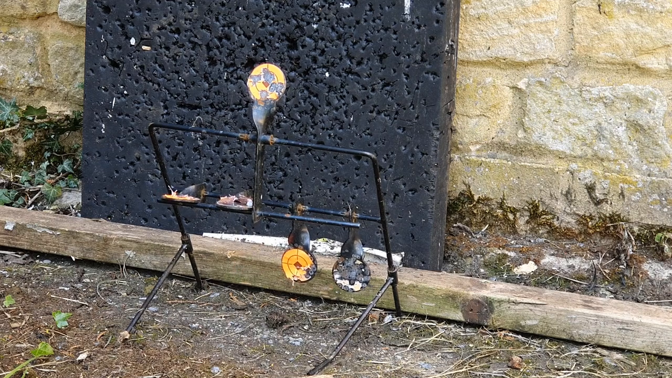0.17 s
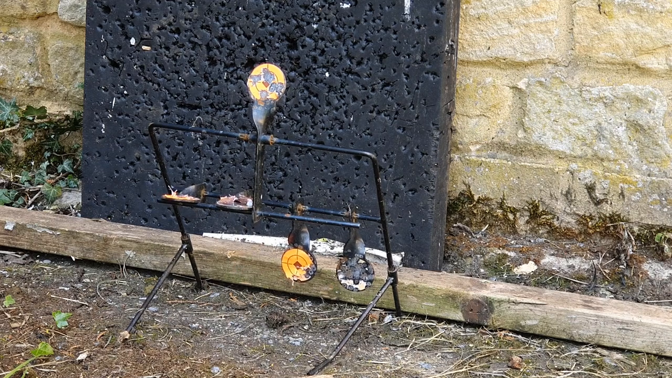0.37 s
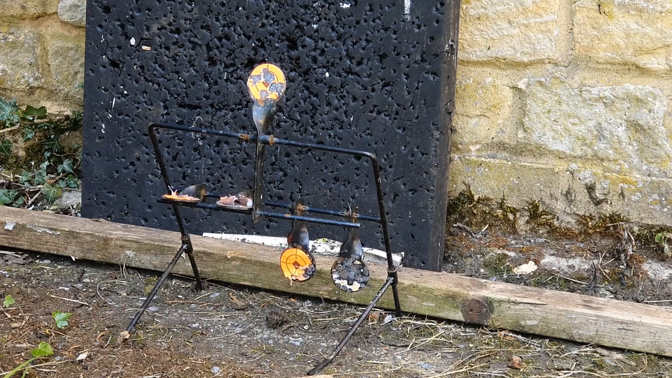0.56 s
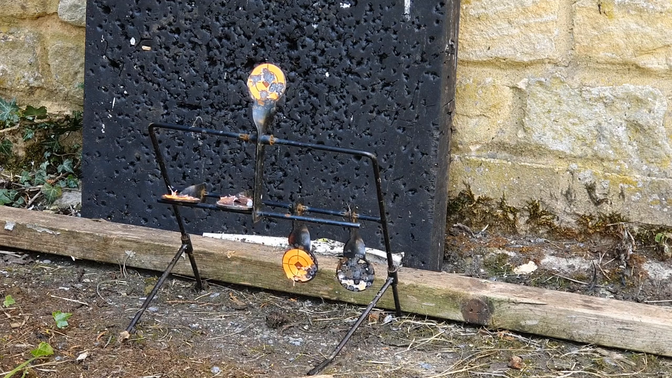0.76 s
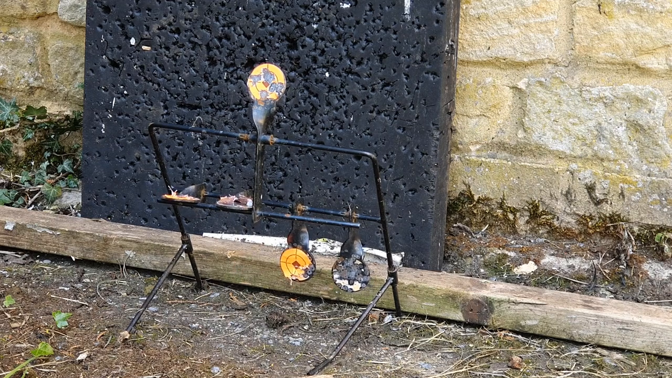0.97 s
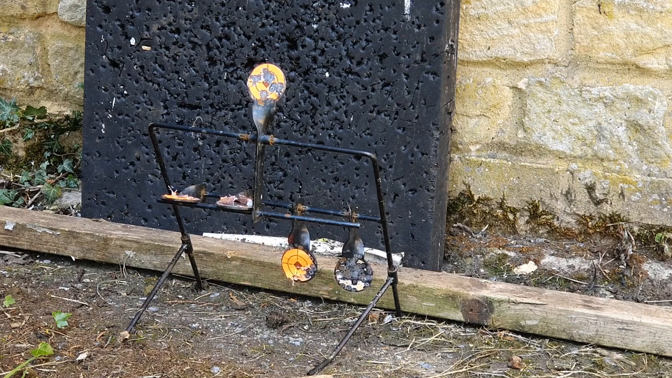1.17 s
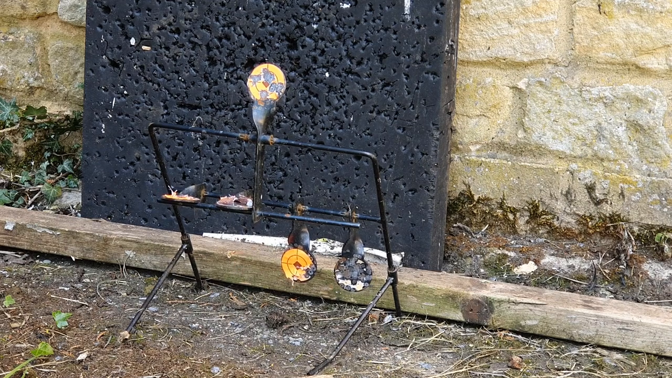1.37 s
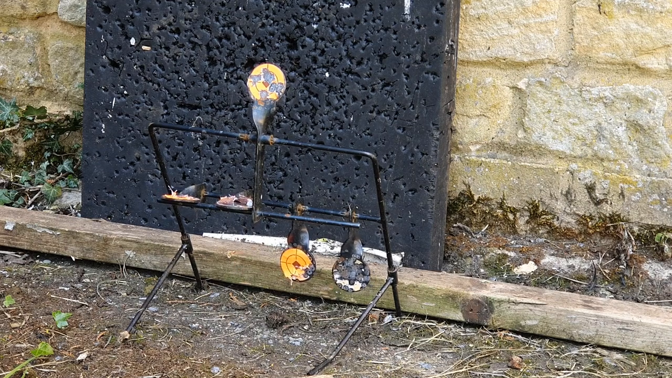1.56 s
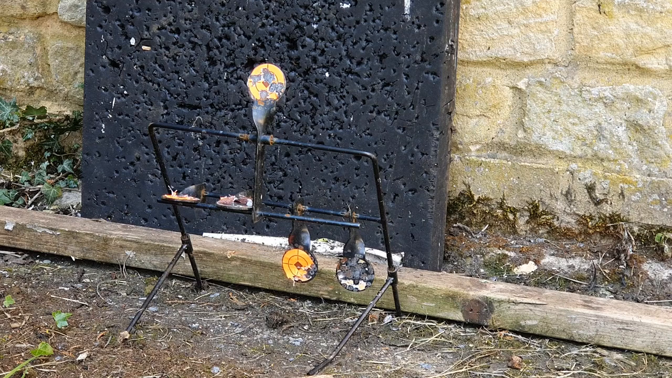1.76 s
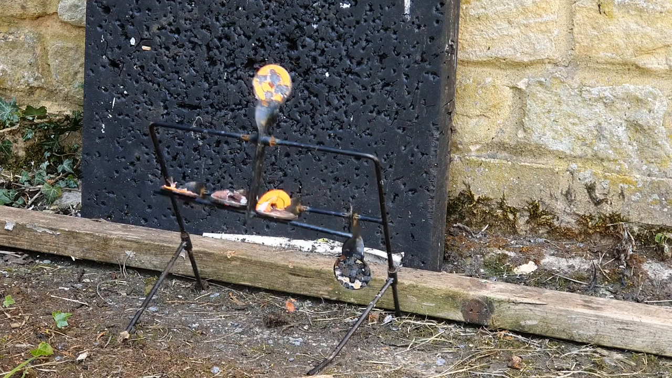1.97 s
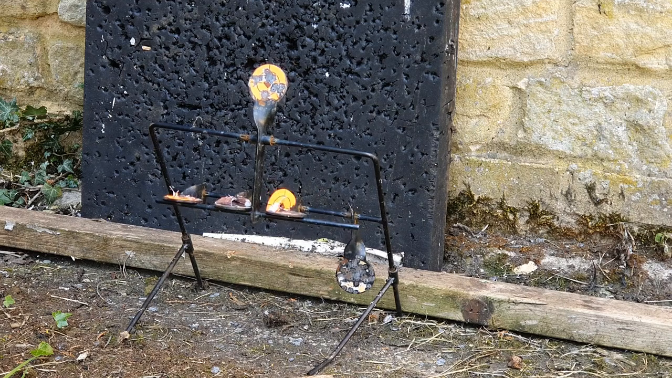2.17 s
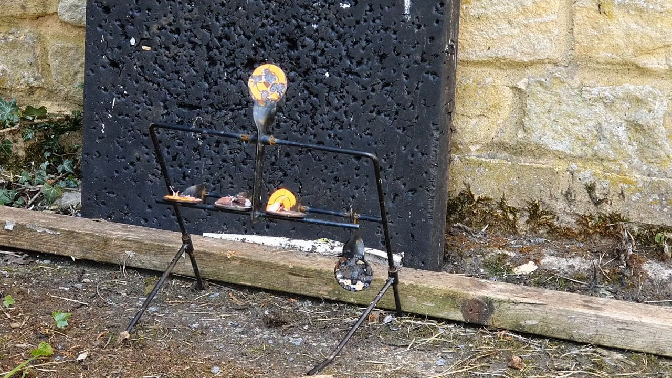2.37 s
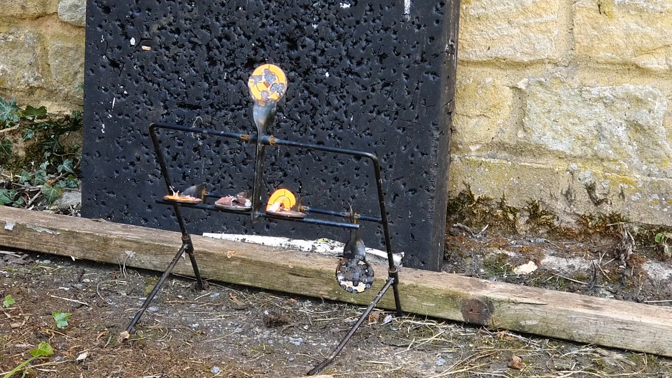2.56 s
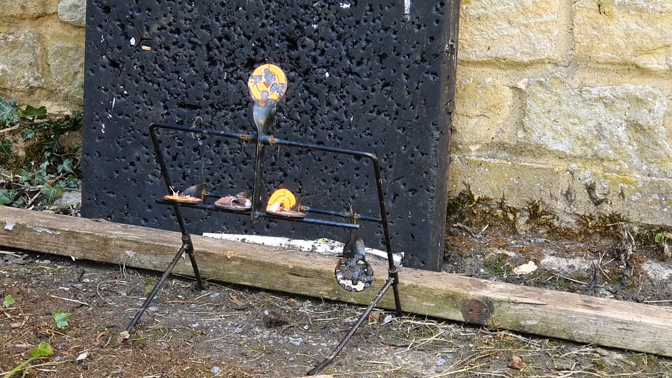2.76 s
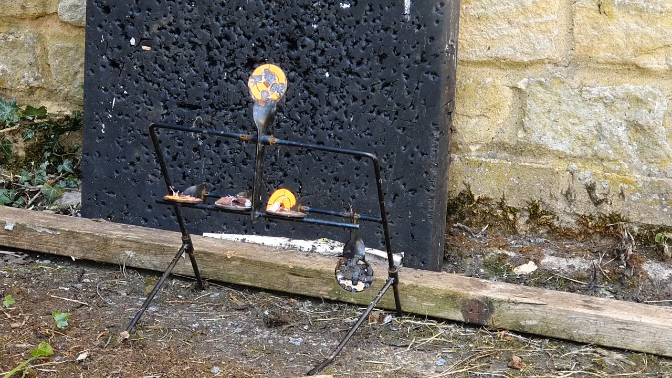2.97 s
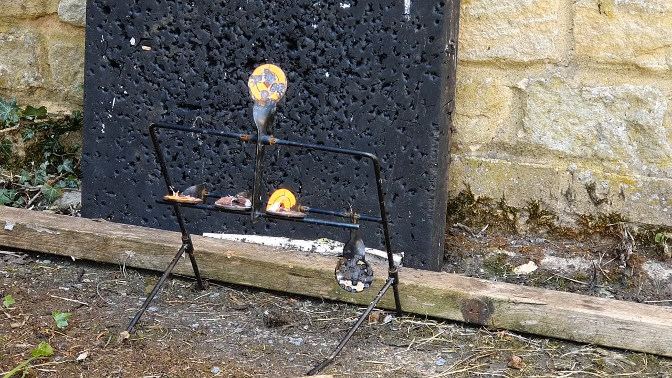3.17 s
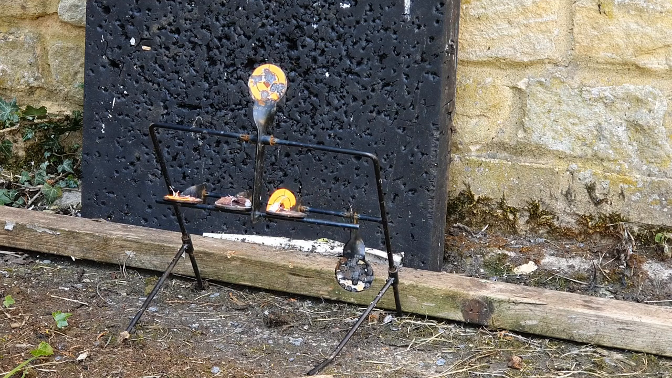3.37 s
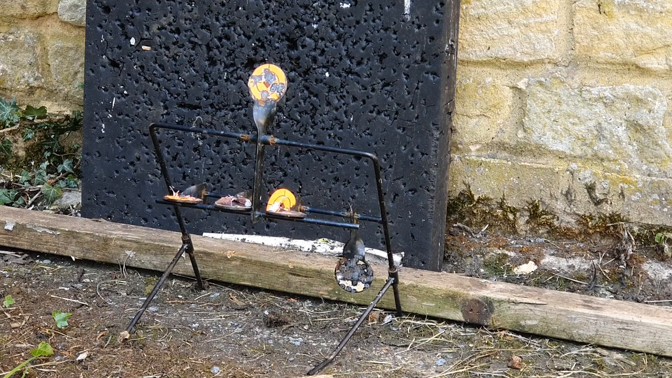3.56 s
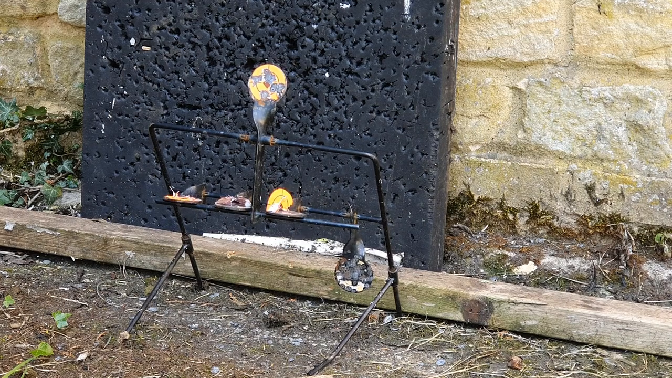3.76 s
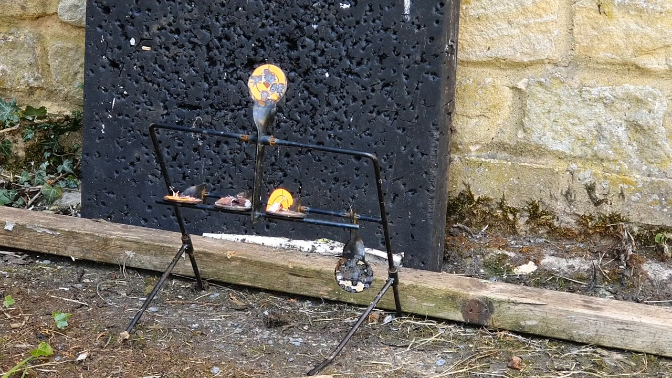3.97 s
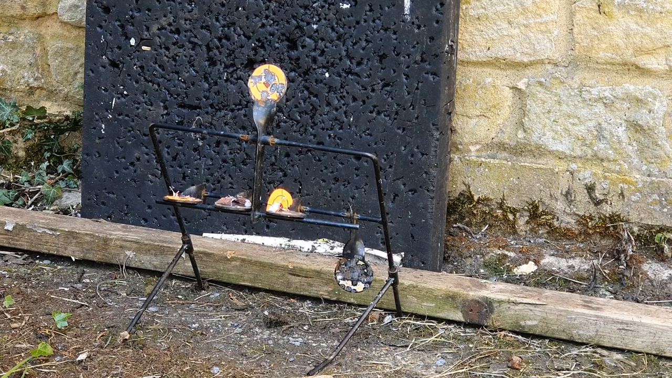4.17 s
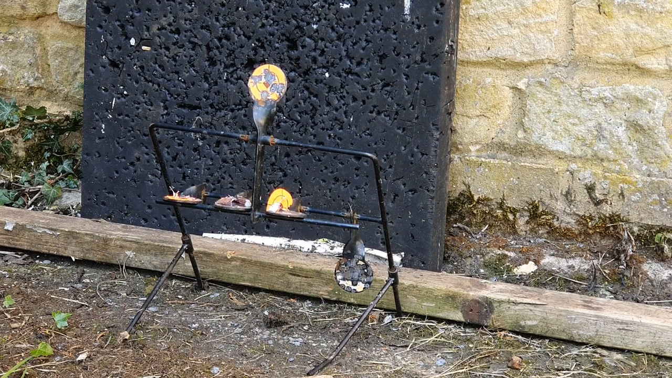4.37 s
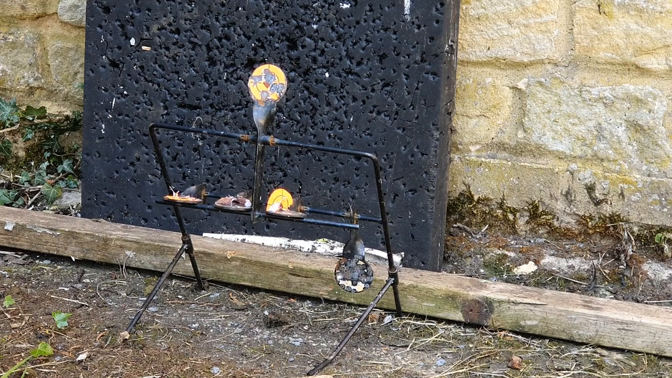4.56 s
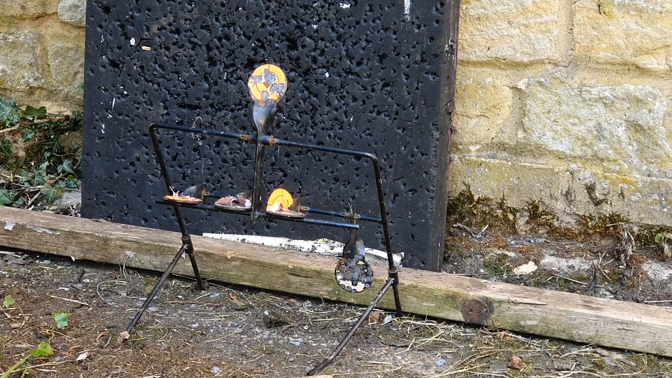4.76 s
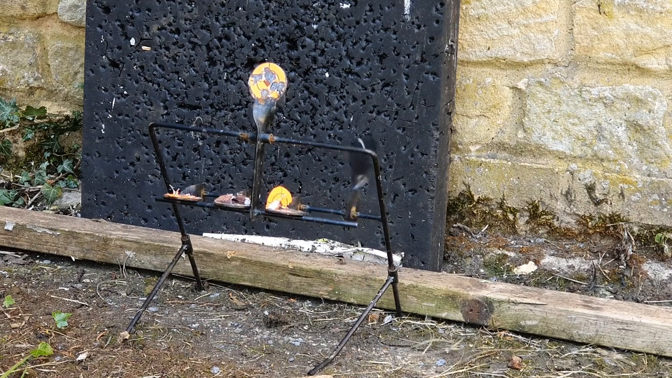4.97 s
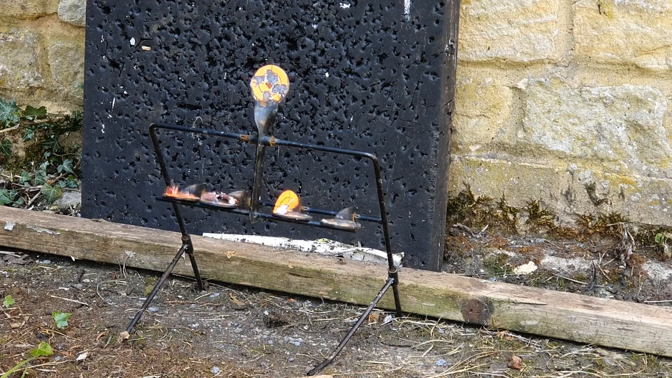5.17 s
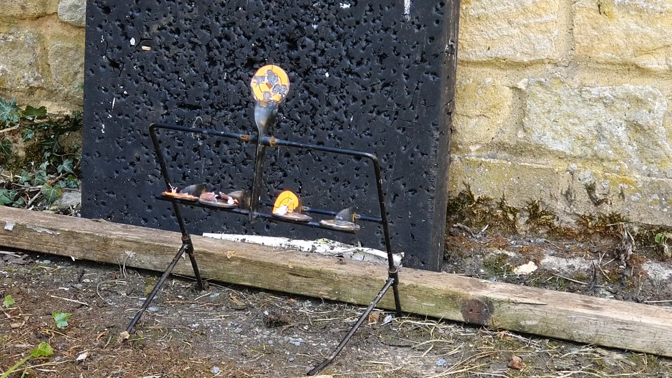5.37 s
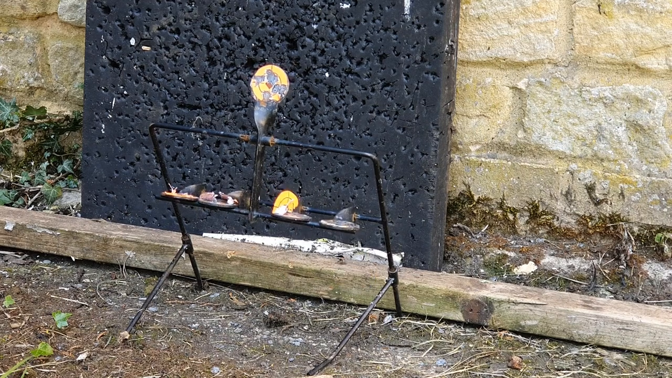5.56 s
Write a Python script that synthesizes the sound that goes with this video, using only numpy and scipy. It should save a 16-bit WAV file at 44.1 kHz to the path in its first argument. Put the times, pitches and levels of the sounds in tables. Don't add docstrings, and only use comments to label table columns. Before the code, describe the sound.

A quiet garden range: low wind puffs, faint hiss and distant bird whistles. Just before two seconds comes a dry, loud air rifle crack, then a metallic smack and a bright clank with rapid rattling that dies quickly. Birds and small ticks return. Near five seconds a slightly softer shot strikes steel, and the flipped paddle clanks and chatters a little later. Short yard echoes, close stereo microphone.

```python
import sys
import numpy as np
from scipy import signal
from scipy.fft import rfft, irfft, next_fast_len
from scipy.io import wavfile
from scipy.ndimage import uniform_filter1d, map_coordinates

SR = 44100
rng = np.random.default_rng(int(sys.argv[2]) if len(sys.argv) > 2 else 0)


def volts_from_decibels(level):
    exponent = np.asarray(level, float) / 20
    return 10 ** exponent


def put_to_file(sound):
    columns = np.atleast_2d(sound).T
    safe = np.clip(columns, -1, 1)
    whole_steps = np.round(safe * 32767)
    wavfile.write(sys.argv[1], SR, whole_steps.astype(np.int16))


N = 251370
T = np.arange(N) / SR


def unit(x):
    return x / np.sqrt(np.mean(x ** 2) + 1e-20)


def along(points, hz):
    f, v = np.transpose(points)
    return np.interp(np.log(hz + 1), np.log(f + 1), v)


def level(rows):
    s, db = np.transpose(rows)
    return volts_from_decibels(np.interp(T, s, db, left=-200, right=-200))


def pan(db):
    return volts_from_decibels([[db / 2], [-db / 2]])


def add(out, s, x):
    i = round(s * SR)
    out[:, i:i + x.shape[1]] += x[:, :N - i]


def filtered(x, response):
    n = x.shape[-1]
    m = next_fast_len(n + 8192)
    return irfft(rfft(x, m) * response(np.fft.rfftfreq(m, 1 / SR)), m)[..., :n]


def peak(hz, width_hz):
    return lambda f: 1j * f * width_hz / (hz * hz - f * f + 1j * f * width_hz)


def rush(spectrum, alike, size=N):
    def shape(hz):
        turn = np.arccos(np.clip(along(alike, hz), -1, 1)) / 2
        return volts_from_decibels(along(spectrum, hz)) * [np.cos(turn), np.sin(turn)]

    mid, side = filtered(rng.standard_normal((2, size)), shape)
    return unit(np.array([mid + side, mid - side]))


# pitch_hz, t60_s
YARD_DECAY = [(100, .7), (500, 0.5), (2000, 0.62), (5000, 0.41), (10000, 0.34), (16000, 0.32)]


def tail(spectrum, stretch, bass=1):
    noise = rush(spectrum, [(60, 0.51), (300, .62), (1400, 0.0065)], size=SR)
    hz, t, z = signal.stft(noise, SR, nperseg=256)
    low_stretch = bass ** (1 / (1 + (hz / 900) ** 2))
    t60 = stretch * low_stretch * along(YARD_DECAY, hz)
    fall_db = 60 * t / t60[:, None] + 16 * (t / 0.55) ** 3
    patches = uniform_filter1d(rng.standard_normal(z.shape), size=3, axis=1)
    patches = uniform_filter1d(patches, size=5, axis=2)
    return signal.istft(z * volts_from_decibels(4.6 * unit(patches) - fall_db), SR, nperseg=256)[1][:, :SR]


def in_room(x, room):
    return signal.fftconvolve(x, room / np.linalg.norm(room[0]), axes=1)[:, :N]


# pitch_hz, left_right_db
SHADOW = [(500, 2), (3500, 3), (5500, -3), (10000, -5), (14000, 4)]


def shaded(x):
    return filtered(x, lambda hz: volts_from_decibels(along(SHADOW, hz) * [[.5], [-.5]]))


def crack(left_db, left_hz, right_db, right_hz, bright_db):
    t = np.arange(400) / SR
    hz = np.array([[left_hz], [right_hz]])
    snap = np.sin(2 * np.pi * hz * t) * volts_from_decibels(5.5 - 60 * t / 0.0012) * (1 - np.exp(-t / .00008))
    snap -= 0.44 * np.roll(snap, 17, axis=1)
    spit = volts_from_decibels(bright_db + 2 - 60 * t / 0.00088) + volts_from_decibels(bright_db - 10.5 - 60 * t / .016)
    hissing = np.diff(rng.standard_normal((2, len(t) + 1))) * .7
    return volts_from_decibels([[left_db], [right_db]]) * (snap + spit * hissing)


ECHO_S = .009


def air(s):
    echo, end = s + ECHO_S, s + .024
    times = [s - 0.004, s, echo - .002, echo + .001, end, end + .015]
    levels_db = -24 + np.array([-36.5, 0, -4.5, -0.5, -.4, -41.5])
    return level(list(zip(times, levels_db)))


# muzzle_s, pellet_flight_s, level_db, left_right_db, echo_length_share
SHOTS = [
    (1.7919, .0328, 0, -1, 1.03),
    (4.8865, .0334, -1.5, -2, 1.03),
]
# left_db, left_hz, right_db, right_hz, bright_db
CRACKS = [
    (-4.5, 4100, 1, 6000, -10.5),
    (-1, 4600, 2, 5040, -12),
    (-4.5, 5200, -5.5, 3300, 0),
]
YARD_BASS = [
    1.35,
    .7,
]
ECHO_LATE_S = [
    .0004,
    0,
]
# pitch_hz, level_db, t60_s
ECHO_RING = (4000, -17, .025)
# pitch_hz, level_db, t60_s
THUD = (510, -33, 0.05)
# pitch_hz, level_db
BLAST_COLOUR = [(45, -42.5), (80, 1), (500, -6), (788, -16.5), (1900, -4), (2390, -5), (4120, -3),
                (6610, -8), (7980, -11.5), (15100, -17.5), (17000, -41)]
# pitch_hz, level_db
YARD_COLOUR = [(45, -43.5), (80, -5), (314, -11), (450, -13.5), (1330, -9), (1980, -10.5), (2960, -5.5),
               (3570, -2), (6010, -3.5), (8170, -8.5), (10400, -1.5), (15100, -11), (17000, -47.5)]


def rifle():
    out, t = np.zeros((2, N)), np.arange(SR // 5)[None] / SR
    for (s, flight, db, side_db, stretch), bass, late in zip(SHOTS, YARD_BASS, ECHO_LATE_S):
        echo = ECHO_S + late
        for delay, snap in zip((0, echo, flight), CRACKS):
            add(out, s + delay, volts_from_decibels(db) * pan(side_db) * crack(*snap))

        push = volts_from_decibels(-27.5 + 0.35 * db - 60 * t / 0.11) * np.sin(2 * np.pi * 97 * t)
        add(out, s - .0015, push * pan(0))

        yard = shaded(tail(YARD_COLOUR, stretch, bass))
        add(out, s + flight, volts_from_decibels(-25 + 0.25 * db) * pan(-2.5) * yard)

        hz, ring_db, t60 = ECHO_RING
        corner = np.sin(2 * np.pi * hz * t + 1.5 * np.sin(3000 * t))
        add(out, s + echo, volts_from_decibels(ring_db - 60 * t / t60) * corner * pan(side_db))

    hz, db, t60 = THUD
    thud = volts_from_decibels(db - 60 * t / t60) * np.sin(2 * np.pi * hz * t)
    add(out, SHOTS[1][0] + ECHO_S, thud * pan(-1.5))
    rushing = rush(BLAST_COLOUR, [(60, 0.92), (400, 0.89), (1500, 0.062)])
    return out + rushing * sum(air(s) for s, *_ in SHOTS) * pan(-.8)


# peak_s, level_db, rise_39db_s, fall_db_per_s
SWINGS = [
    (1.93, -21, -0.0086, 287),
    (5.064, -27, 0.02, 380),
    (5.201, -30, 0.3052, 620),
    (5.3, -73.5, 0.2, 154),
]


def chatter():
    return sum(level([(s - rise, db - 39), (s, db), (s + .3, db - .3 * fall)])
               for s, db, rise, fall in SWINGS)


SECOND_PADDLE_S = 3.7
RINGING = np.flatnonzero((T > 1.8) & (T < 3.3) | (T > 4.9))


def ring(force, hz, t60):
    poles = volts_from_decibels(-60 / (np.array(t60) * SR)) * np.exp(2j * np.pi * hz / SR)
    paddles = np.split(force, [np.sum(T[RINGING] < 4)])
    swing = np.concatenate([signal.lfilter([1], [1, -p], f) for p, f in zip(poles, paddles)])
    turn = np.exp(1j * 0.54 * rng.standard_normal((2, 1)))
    knots = rng.standard_normal(400)
    rocking = np.interp(T[RINGING] * 55, np.arange(len(knots)), knots)
    flutter = volts_from_decibels(1.5 - 2.9 * np.abs(rocking))
    return (swing * flutter * turn).imag * pan(-4 + 2.2 * rng.standard_normal())


# pitch_hz, first_paddle_db, second_paddle_db, first_t60_s, second_t60_s
STEEL = [(1680, -22.5, -23.5, 0.095, .05), (2375, -20.5, -34.5, 0.15, .1), (3410, -22, -38, .22, .1),
         (3490, -34, -20.5, 0.15, .17), (4670, -10.5, -12, 0.073, 0.087), (4780, -1.5, -12, 0.12, .09),
         (5345, -19.5, -8, .2, 0.12), (5800, -13, -19.5, 0.058, .058), (6450, -17.5, -21, 0.4, 0.58),
         (6640, -22.5, -25, .25, .15), (6900, -18, -22, .35, 0.32), (8102, -17, -12.5, 0.11, 0.069),
         (8056, -14.5, -18.5, .17, 0.17), (9500, -17, -15, .15, 0.1), (10150, -11, -11.5, 0.17, .1),
         (10340, -7.5, -8, 0.25, .1), (10420, -8, -7.5, 0.16, 0.18), (11500, -18.5, -16, 0.11, .08),
         (11790, -15.5, -12, 0.077, .075), (12130, -16.5, -17.5, 0.074, .07),
         (13755, -8.5, -11.5, 0.08, .055), (13840, -13, -12, 0.094, .1), (15140, -9.5, -5.5, .11, .065),
         (15600, -17, -15.5, .12, .07), (5330, -13.5, -28, 0.25, .1), (1375, -21.5, -25, .08, 0.054),
         (3200, -15, -19.5, 0.069, 0.11), (3665, -14.5, -21.5, .07, .07), (4088, -15, -26, .07, .07),
         (7600, -15, -20.5, 0.054, .05), (8300, -19.5, -10.5, .04, .04)]
# start_s, pitch_hz, blow_db
GRAZES = [(1.946, 15190, -24), (1.983, 13755, -25), (2.02, 13755, -32.5), (1.983, 8040, -31),
          (2.002, 8040, -36), (2.028, 8050, -27.5), (1.99, 5300, -27), (2.01, 5300, -30.5),
          (2.05, 5300, -43.5), (2.032, 10470, -38), (1.998, 7400, -35.5), (2.035, 6860, -32),
          (2.03, 2380, -33), (5.062, 5340, -28.5), (5.074, 8040, -26.5), (5.138, 5340, -30.5),
          (5.197, 5340, -30), (5.171, 10470, -38), (5.193, 10160, -26), (5.168, 15190, -34),
          (5.165, 13850, -28), (5.14, 6465, -32), (5.08, 4792, -20), (5.175, 8030, -27.5)]


def steel_modes(at, blow_db, tilt_db, loose):
    out = np.zeros((2, N))
    scrape_s = .0012
    step = np.arange(round(scrape_s * SR)) / (scrape_s * SR)
    scrape = np.sin(np.pi * step) / np.sin(np.pi * step).sum()
    grit = loose * (rng.random(N) < 1500 / SR) * volts_from_decibels(1.7 * rng.standard_normal(N))
    for hz, first_db, second_db, first_t60, second_t60 in STEEL:
        force = np.zeros(N)
        for s, graze_hz, db in GRAZES:
            force[round(s * SR)] = volts_from_decibels(db) * (abs(graze_hz / hz - 1) < .012)

        hit_db = blow_db - 4.0 + tilt_db * np.log2(hz / 7000) + 1.9 * rng.standard_normal(len(at))
        force[at] += volts_from_decibels(hit_db) * rng.choice([-1, 1], len(at))
        force = np.convolve(force, scrape * np.exp(2j * np.pi * hz * scrape_s * step))[:N]
        force = force + grit * volts_from_decibels(-17) * rng.standard_normal(N)
        force = (force * volts_from_decibels(np.where(T > SECOND_PADDLE_S, second_db, first_db)))[RINGING]

        out[:, RINGING] += ring(force, hz, (first_t60, second_t60))
        twin_hz = hz * (1 + 0.015 * rng.standard_normal())
        out[:, RINGING] += volts_from_decibels(6.5) * ring(force, twin_hz, [0.26 * first_t60, 0.26 * second_t60])
    return out


# start_s, level_db
SPIKES = [
    (4.9196, -8),
    (1.9318, -9.5),
    (5.0615, -19),
    (5.1931, -30.5),
    (5.262, -49),
]
# pitch_hz, level_db
CLICK = [(500, -31.5), (1500, -8.5), (3000, -4.5), (5000, 5.5), (8000, -1), (11000, -5), (15500, -6.5),
         (17000, -43)]
# pitch_hz, level_db
GAPS = [(2700, -5), (7400, -5), (8900, -9), (12700, -8), (14500, -9)]


def contact_clicks(at, click_db, loose):
    t = np.arange(900) / SR
    clicks = volts_from_decibels(-9.0) * loose * rng.standard_normal((2, N))
    for s, db in zip(at / SR, click_db):
        shape = volts_from_decibels(db - 3.0 - 60 * t / 0.02) * (1 - np.exp(-t / 0.0002))
        shared = 0.99 * rng.standard_normal(len(t))
        add(clicks, s, shape * (shared + rng.standard_normal((2, len(t)))))
    for s, db in SPIKES:
        add(clicks, s, volts_from_decibels(db - 60 * t / .0012) * rng.standard_normal((2, len(t))))

    thicket = rng.standard_normal(200)

    def frame(hz):
        small_modes_db = 4.3 * np.interp(hz / 130, np.arange(len(thicket)), thicket)
        gaps_db = sum(db * np.exp(-((hz - gap_hz) / 350) ** 2) for gap_hz, db in GAPS)
        return volts_from_decibels(along(CLICK, hz) + small_modes_db - 2 + gaps_db)

    return filtered(clicks, frame) * pan(-2.5)


# start_s, blow_db, click_db
PELLETS = [
    (1.8248, -32.5, -30.5),
    (4.9197, -28, -16),
    (4.9348, -34.5, -20),
]
# start_s, blow_db, click_db
KNOCKS = [(1.9296, -20, -17), (1.9315, -30, -8.5), (1.942, -32, -30), (1.952, -28.5, -28),
          (1.983, -30, -31), (1.998, -40, -29.5), (2.012, -41, -28), (2.0275, -35, -31),
          (2.038, -45.5, -33.5), (2.051, -50, -46), (2.076, -65, -46), (5.0606, -25.5, -23),
          (5.064, -22.5, -16), (5.074, -34, -27.5), (5.088, -29.5, -34), (5.1386, -40, -33),
          (5.167, -34.5, -37), (5.171, -36.5, -35.5), (5.1923, -31.5, -26.5), (5.21, -59, -32),
          (5.23, -47, -33.5), (5.262, -76, -47), (5.518, -99, -81)]


def target():
    when, blow_db, click_db = np.transpose(PELLETS + KNOCKS)
    at = np.round(when * SR).astype(int)
    tilt_db = np.where(when > SECOND_PADDLE_S, 1, 0) + 0.13 * (blow_db + 27.0)
    tilt_db[:len(PELLETS)] = 4.5
    loose = chatter()
    out = steel_modes(at, blow_db, tilt_db, loose) + contact_clicks(at, click_db, loose)
    room = tail([(100, 0.5), (16000, -0.5)], stretch=0.54)
    return out + volts_from_decibels(-9.0) * in_room(out, room)


# start_s, level_db, pitch_hz, t60_s
TICKS = [(3.015, -54, 6900, 0.0081), (3.016, -49, 11500, 0.0083), (3.0164, -62, 3540, 0.045),
         (3.017, -65, 1900, 0.023), (3.46, -63, 1997, 0.077), (3.462, -69, 3600, .08),
         (3.38, -78, 6000, 0.018), (3.44, -74, 6960, 0.41), (3.44, -64.5, 2170, 0.28),
         (3.441, -72, 4170, 0.29), (3.687, -55, 2370, 0.027)]


def ticks():
    out, t = np.zeros((2, N)), np.arange(SR // 4) / SR
    for s, db, hz, t60 in TICKS:
        fall = volts_from_decibels(-60 * t / t60) + volts_from_decibels(-23 - 60 * t / 0.28)
        burst = fall * rng.standard_normal((2, len(t)))
        resonance = peak(hz, .45 * hz)
        add(out, s, volts_from_decibels(db + 4.0) * filtered(burst, lambda f: resonance(f) ** 2))
    return out


# start_s, length_s, from_hz, to_hz, level_db
WARBLES = [(0, 0.062, 1925, 2210, -74), (0.066, .17, 2353, 3250, -66), (0.216, 0.089, 2590, 2004, -66.5),
           (0.497, .16, 2617, 1714, -66), (0.726, 0.21, 2196, 2527, -66), (0.794, 0.33, 2088, 1845, -66),
           (0.838, 0.26, 2620, 3356, -65), (0.905, 0.24, 2260, 2790, -77), (1.159, 0.22, 2512, 2381, -67),
           (3.68, 0.051, 2303, 2290, -72), (3.714, .28, 2294, 2320, -87.5), (4.327, 0.21, 2315, 2689, -80),
           (4.328, 0.27, 3216, 3500, -81.5), (4.699, 0.1, 2620, 2930, -77.5)]
# start_s, length_s, from_hz, to_hz, level_db
CHIPS = [(0.486, 0.11, 5530, 5250, -82), (0.506, 0.058, 5780, 5680, -83), (0.53, 0.1, 4480, 4280, -84),
         (1.172, .15, 4730, 4480, -80), (1.712, 0.15, 5270, 4750, -63), (2.318, 0.056, 4500, 4400, -86.5),
         (2.421, 0.16, 4304, 4210, -92), (2.86, 0.14, 5210, 4780, -64.5), (2.93, 0.084, 4830, 4500, -70.5),
         (2.983, 0.16, 5055, 5010, -84), (3.376, 0.064, 4120, 4270, -88.5), (4.516, 0.078, 8020, 7600, -87),
         (4.577, 0.084, 6750, 6940, -75.5), (4.745, 0.049, 6530, 6530, -77),
         (4.832, 0.065, 7470, 7360, -73)]
# start_s, length_s, pitch_hz, level_db
WHISTLES = [
    (1.475, 0.33, 1775, -67),
    (2.002, 0.34, 1759, -78),
    (2.344, 0.28, 2593, -83.5),
    (2.518, 0.32, 2549, -70),
]
# start_s, length_s, pitch_hz, level_db
RASPS = [(0.012, 0.18, 4680, -66.5), (0.017, .15, 5700, -76.5), (0.021, 0.14, 7100, -81.5),
         (1.152, .16, 7030, -85.5), (1.16, 0.14, 4560, -82), (1.366, 0.16, 6770, -90.5),
         (2.859, 0.064, 5626, -75), (3.707, 0.07, 5060, -73.5), (3.714, 0.066, 4450, -71),
         (4.699, 0.091, 5850, -72.5)]


def notes():
    rows = []
    for s, length, a, b, db in WARBLES:
        rows.append((s, length, a, b, 65.4 + 0.022 * abs(b - a) / length, db, 0))
    for s, length, a, b, db in CHIPS:
        rows.append((s, length, a, b, 45 * (a / 5000) ** 3, db, -2.5))
    for s, length, hz, db in WHISTLES:
        rows.append((s, length, hz, hz - 93 * length, 9.4, db, -7))
    for s, length, hz, db in RASPS:
        rows.append((s, length, hz, hz * (1 - 0.14), hz * .08, db, -5 * (hz / 1000 - 3.6)))
    return rows


def birds():
    near, far = np.zeros((2, 2, N))
    for s, length, from_hz, to_hz, warble_hz, db, side_db in notes():
        u = np.arange(round(length * SR)) / (length * SR)
        knots = rng.standard_normal(300)
        waver = map_coordinates(knots, [u * length * 420])
        hz = from_hz + (to_hz - from_hz) * u + warble_hz * waver
        breath_db = 3 * map_coordinates(knots[::-1], [u * length * 25])
        swell = np.sin(np.pi * u ** .7)
        note = volts_from_decibels(db + breath_db) * pan(side_db) * swell * np.sin(2 * np.pi * np.cumsum(hz) / SR)
        wet = np.clip(0.53 + warble_hz / 150, 0, .9)
        add(near, s, note * np.sqrt(1 - wet ** 2))
        add(far, s, note * wet)
    room = tail([(1000, 0.0035), (9000, 0.0013)], stretch=0.63)
    return volts_from_decibels(2.0) * near + volts_from_decibels(4.0) * in_room(far, room)


# peak_s, peak_db, pitch_hz
THUMPS = [(0.07, -27, 59), (0.18, -51, 63), (0.243, -47.5, 64), (0.302, -29.5, 60.5), (0.393, -40, 83),
          (0.453, -34, 65), (0.628, -41.5, 60.6), (0.896, -34, 62), (1.398, -46, 51.6), (1.499, -45, 77.4),
          (1.658, -32, 56), (2.018, -45, 84), (2.435, -40.5, 72), (2.983, -45.5, 76), (3.156, -41, 57.5),
          (3.228, -37, 68.9), (3.336, -48, 68.9), (3.409, -34.5, 69.1), (3.591, -37, 70),
          (3.656, -38, 68.6)]
# peak_s, peak_db, pitch_hz
RIGHT_THUMPS = [
    (1.922, -47.5, 88.9),
    (2.285, -41, 73.6),
]


def puffs():
    out, t = np.zeros((2, N)), np.arange(-2600, 2600) / SR
    breath = [(120, -6), (200, 1.0), (500, -17.5), (1000, -24.5), (2000, -50.5)]
    edge = rush(breath, [(100, 0.0011)])[0]
    lee_db = 29
    sided = [(*row, lee_db) for row in THUMPS] + [(*row, -lee_db / 2) for row in RIGHT_THUMPS]
    for s, db, hz, side_db in sided:
        rock = np.exp(-(t / 0.011) ** 2) * np.cos(2 * np.pi * hz * t + rng.uniform(-1.6, 1))
        rock += volts_from_decibels(-30.5) * np.exp(-(t / .01) ** 2) * edge[round(s * SR):][:len(t)]
        add(out, s + t[0], volts_from_decibels([[db + min(side_db, 0)], [db - max(side_db, 0)]]) * rock)
    return out


# time_s, level_db
BUFFET = [(0.0, -52.5), (0.3, -62), (0.46, -62.5), (1.19, -63.5), (1.86, -61.5), (2.02, -64), (2.49, -61),
          (2.71, -71), (3.35, -58.5), (3.52, -56.5), (3.67, -61), (4.37, -64.5), (4.9, -63), (5.4, -73.5),
          (5.7, -72.5)]
# pitch_hz, level_db
RUMBLE = [(15, -49), (25, -17.5), (43, 0), (65, -0.5), (114, -5), (152, -20), (500, -42.5), (650, -58),
          (1100, -120)]
# pitch_hz, level_db
HISS = [(90, -29.5), (150, -2.5), (246, -4), (400, -17), (800, -20.5), (2300, -25.5), (3300, -26),
        (6500, -35), (8500, -38), (10500, -33), (15000, -32), (17000, -44.5)]
# pitch_hz, likeness
ALIKE = [(60, 0.8), (240, 0.53), (950, -0.15), (3770, 0.011), (15000, -0.29)]
# time_s, level_db
GAIN = [(0, 3), (1.79, 2.5), (1.83, -1.5), (2.8, -7), (3.4, 0), (3.67, 3), (3.75, 1.5), (4.88, 2),
        (4.92, -8), (5.7, -6.5)]


def wind():
    lumps = volts_from_decibels(2.7 * np.array([map_coordinates(k, [T * 12]) for k in rng.standard_normal((2, 80))]))
    rumble = unit(lumps * rush(RUMBLE, [(40, 1.0), (130, 0.68), (300, .6)]))
    rumble = volts_from_decibels(3.0) * pan(3.9) * level(BUFFET) * rumble
    return rumble + volts_from_decibels(-75.5) * level(GAIN) * rush(HISS, ALIKE)


def scene():
    return rifle() + shaded(target()) + ticks() + birds() + puffs() + wind()


def top_cut(x):
    return signal.sosfilt(signal.butter(12, 17150, fs=SR, output="sos"), x)


# pitch_hz, level_db
TOP = [(15750, 0), (16000, -40)]
# pitch_hz, level_db
EDGE = [(16700, -6), (17000, -40), (17100, -90)]


def record(dry):
    dip = volts_from_decibels(-22 * np.exp(-((T - 3.713) / 0.016) ** 2))
    x = dry * dip
    x = x / (1 + np.abs(x / .99) ** 6) ** (1 / 6)
    low = filtered(x, lambda hz: volts_from_decibels(along(TOP, hz)))
    high = filtered(x - low, lambda hz: volts_from_decibels(along(EDGE, hz)))
    power = np.abs(uniform_filter1d(high ** 2, size=400)) ** 2
    opening = power / (power + volts_from_decibels(-38.0) ** 4)
    return top_cut(low + high * opening)


dry = scene()
out = record(dry)
put_to_file(out)
```